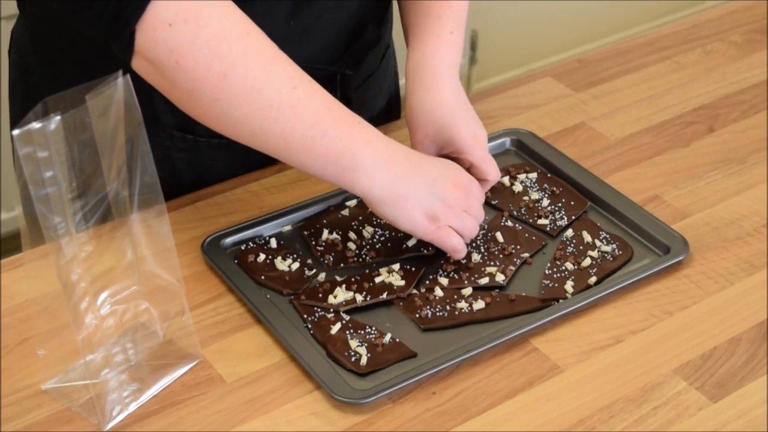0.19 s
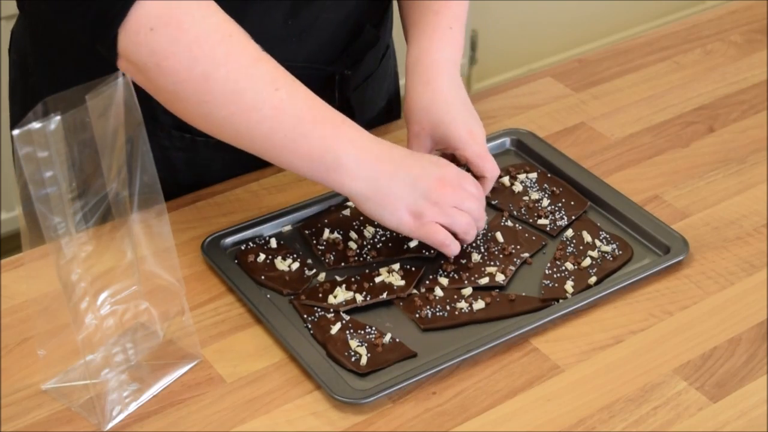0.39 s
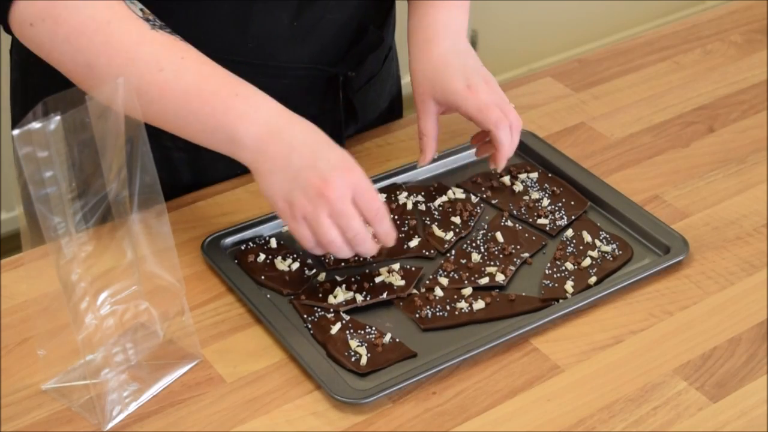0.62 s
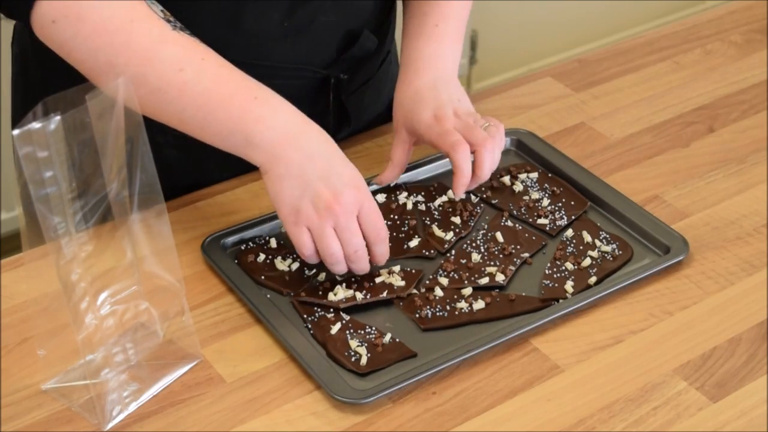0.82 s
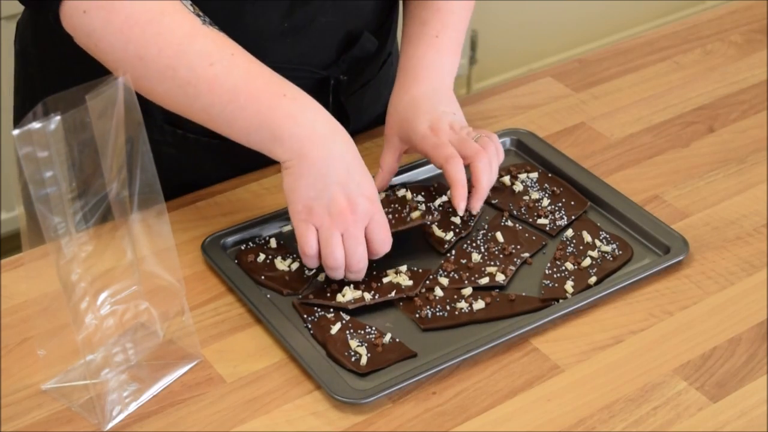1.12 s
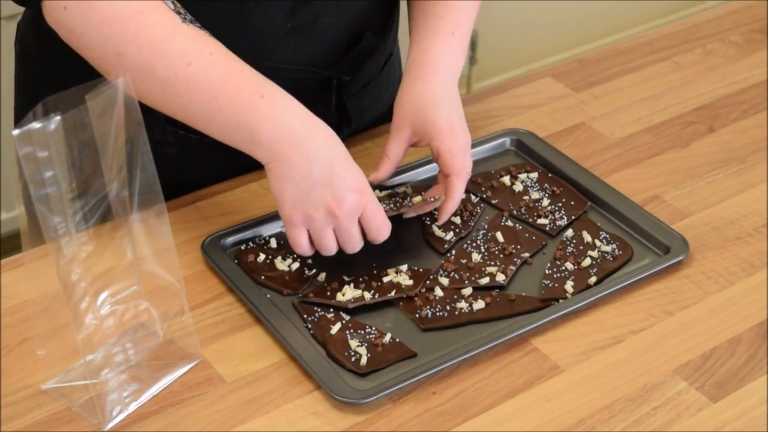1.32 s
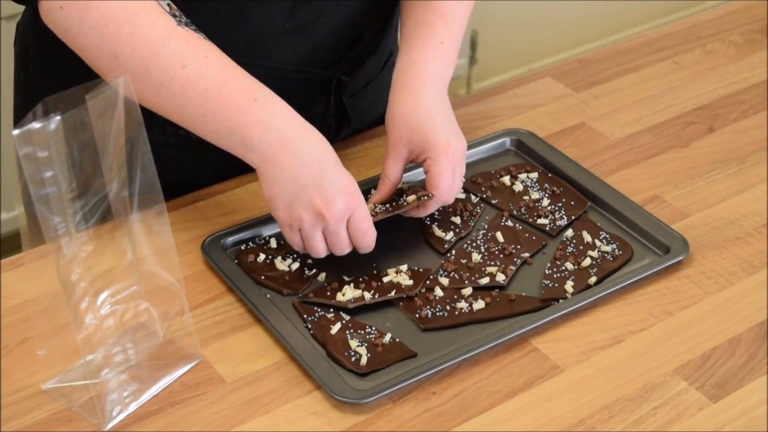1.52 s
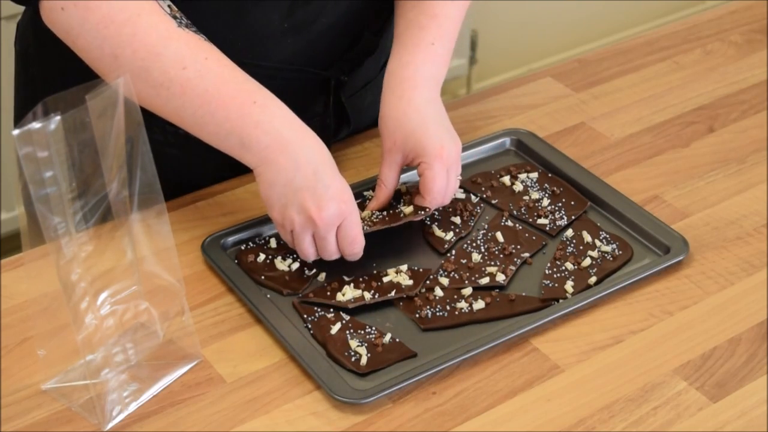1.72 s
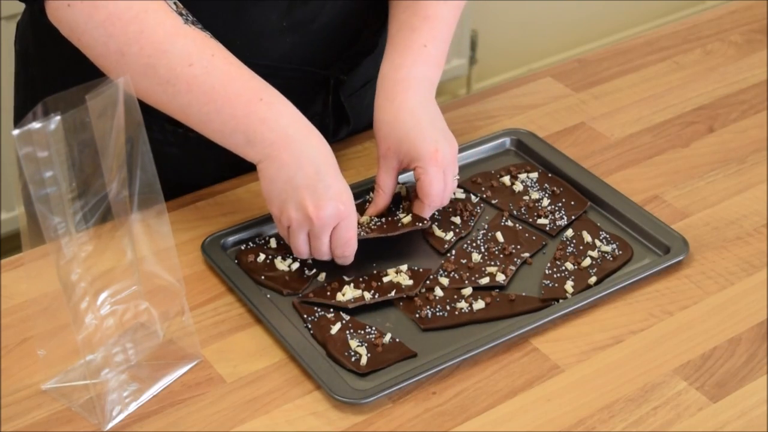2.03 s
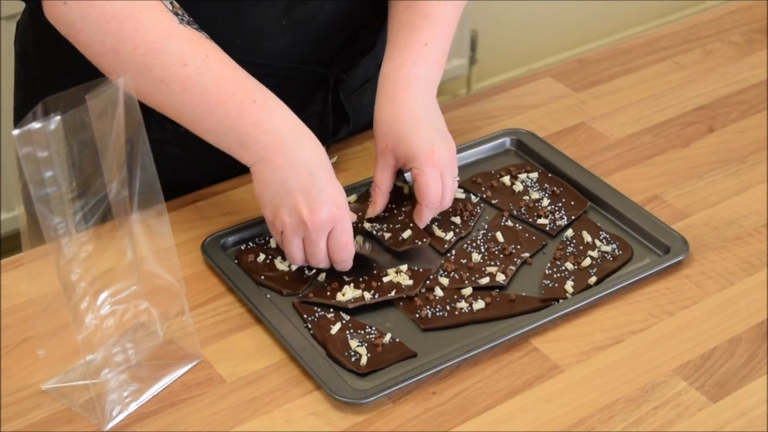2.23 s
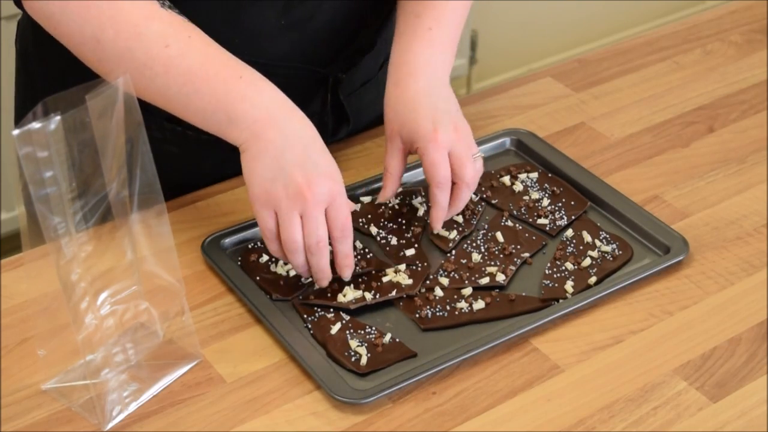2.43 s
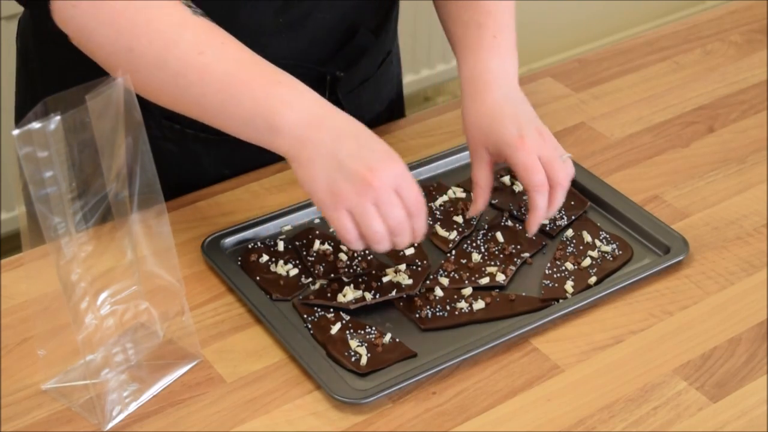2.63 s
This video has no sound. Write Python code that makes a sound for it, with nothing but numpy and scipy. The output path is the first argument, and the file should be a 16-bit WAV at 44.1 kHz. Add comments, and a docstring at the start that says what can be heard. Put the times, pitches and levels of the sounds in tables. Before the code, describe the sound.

Hard chocolate pieces crack sharply and clack against a baking tray in a small indoor kitchen.

```python
"""Hands snap set chocolate on a metal baking tray, close and near the middle, in a small kitchen, 2.75 s.
Hiss and a thin whine run throughout; a faint slide and knock lead to the first hard snap at 0.24 s.
A second snap follows at 0.61 s, then lesser knocks, slides and crunches; single knocks from 1.5 s to 2.1 s.
From 2.27 s pieces slide, crunch and settle, and faint knocks end it. Each contact is a burst of tiny
fractures ringing the piece and the tray's modes; dense reflections answer briefly from the room."""
import sys
import numpy as np
from scipy import signal
from scipy.fft import rfft, irfft
from scipy.io import wavfile

SR = 44100
rng = np.random.default_rng(int(sys.argv[2]) if len(sys.argv) > 2 else 0)


def materialize(psi):
    """Save the field psi as 16-bit PCM at rate SR to the path in sys.argv[1].

    A 1-D psi becomes a single channel; in a 2-D psi each row is a channel.
    """
    bounded = np.clip(np.atleast_2d(psi).T, -1, 1)
    quanta = np.round(bounded * 32767).astype(np.int16)
    wavfile.write(sys.argv[1], SR, quanta)


def attenuation_scalar(level_db):
    """Turn a level in dB into a linear amplitude multiplier (20 dB per decade)."""
    decades = np.asarray(level_db, float) / 20
    return 10 ** decades


N = 121275

# Background of appliances and microphone, spectrum shape: f/Hz, relative density/dB
HISS_SHAPE = [(15, -50), (25, -32), (59, -7), (120, -7), (149, -12), (195, -2.5), (416, -4.5), (531, -5),
              (575, -4.5), (796, -4), (2000, -8.5), (2220, -7.5), (3340, -15), (6740, -21), (16000, -33)]
# Likeness of left and right in the hiss: f/Hz, correlation/1
HISS_LIKENESS = [(60, 0.99), (180, 0.95), (550, 0.79), (1650, 0.39), (4970, 0.073), (15000, 0.19)]
HISS_DB = -55   # rms over both channels
# Partials of the whine: multiple of its pitch/1, rms level before the wobble/dB
WHINE_PARTIALS = [(1, -66.5), (2, -85), (3, -87), (4, -92)]
WHINE_HZ, WHINE_WOBBLE_DB, WHINE_WOBBLE_PER_S = 2255.5, 1.5, 8.0
# Narrow hums: f/Hz, width of each resonance/Hz, rms level/dB
NARROW_HUMS = [(123, 21, -72), (253, 6.7, -73), (543, 9.3, -72), (834, 24, -72), (2925, 210, -69)]
# One faint high hum: f/Hz, width of each resonance/Hz, rms level/dB
HIGH_HUM = (6590, 60, -83)

# Decay of the kitchen by 60 dB: f/Hz, t60/s
ROOM_DECAY = [(250, 1), (1000, 0.4), (3000, 0.28), (8000, 0.33), (14000, 0.23)]
# Likeness of left and right in the reflections: f/Hz, correlation/1
ROOM_SIDES = [(250, 0.99), (1000, 1), (3000, 0.8), (9000, 0.61)]
ROOM_DB, ROOM_DELAY_S = -7.5, 0.0022   # energy of the room's answer; silence before it starts

# Pieces sliding: start t/s, length/s, body level/dB, treble level/dB (both at the middle of the slide)
SLIDE_EVENTS = [(.022, 0.012, -50.5, -50.5), (0.393, 0.11, -54, -65.5), (0.872, 0.086, -54.5, -65.5),
                (0.938, 0.091, -60, -69), (1.027, 0.033, -51, -63), (1.133, 0.023, -61, -71),
                (1.163, 0.053, -52, -62), (2.268, 0.065, -45, -55.5), (2.332, 0.056, -51, -53),
                (2.393, 0.041, -51.5, -60), (2.456, 0.017, -55, -67), (2.53, 0.036, -53, -71)]
FRACTURES_PER_S, FRACTURE_SPREAD_DB = 14000, 2.5
BODY_LOW_HZ, BODY_HIGH_HZ = 610, 3890
TREBLE_LOW_HZ, TREBLE_HIGH_HZ = 4440, 10980

# Tray modes: f/Hz, relative level/dB, t60/s
TRAY_MODES = [(237, -5.5, 0.27), (294, 0, .08), (368, 5, 0.091), (447, -4, .07), (692, 5, 0.13),
              (825, -14.5, 0.22), (1077, -23, 0.3), (1213, -17, 0.41), (1470, 8, 0.14), (1560, -13, 0.36),
              (1900, -4, 0.2), (1955, 12, 0.17), (2186, -36, 0.13), (2430, -2, 0.11), (3070, -44, 0.11),
              (3180, 22, 0.033), (3890, 0, 0.2)]
# A piece lands flat and the low modes boom: t/s, drive level/dB, centre f/Hz
THUD_EVENTS = [(.243, -38, 504), (.250, -38.5, 684), (.252, -38.5, 384), (.612, -37.5, 580),
               (.629, -41, 353), (.860, -54, 700), (.885, -53, 392), (1.006, -53, 750), (1.030, -58, 700),
               (1.119, -56, 700), (1.541, -44.5, 455), (1.548, -46, 307), (2.116, -34, 667),
               (2.120, -36.5, 242), (2.286, -46, 680), (2.288, -43.5, 325), (2.448, -44, 404),
               (2.478, -44, 388), (2.487, -40, 720)]
TRAY_DB, STRIKE_SPREAD_DB = -17.5, 2.0   # tray drive against the piece's ring; chance per mode
TRAY_REACH_OCT, THUD_REACH_OCT = 0.95, 0.46   # distance from the centre where a mode is 6 dB down
THUD_MS, TRAY_TO_ROOM_DB = 1.0, -10

# Sharp cracks and knocks:
# t/s, body level/dB, piece pitch f/Hz, ring level re body/dB, treble level re body/dB
KNOCK_EVENTS = [(0.1308, -58.5, 1270, 2.5, -9), (.2310, -29.5, 1900, -27, -9),
                (0.2404, -22, 1695, -4.5, -6.5), (0.3891, -39, 1720, -7.5, -9),
                (0.4414, -49.5, 1760, 0, -17), (.6037, -32.5, 2800, 6.5, -9),
                (0.6068, -23, 1560, -5.5, -15), (.8590, -38, 805, -8.5, -22), (0.881, -36, 1870, -12, -12),
                (1.0282, -42, 1770, -15, -12), (1.1265, -44, 1180, -3, -18),
                (1.5376, -32.5, 1180, -12, -11), (1.5457, -38, 1253, 8.5, -3.5),
                (1.8140, -41.5, 3350, -9, -9), (2.1098, -29, 1450, -10, -2), (2.382, -48, 3000, -5, -10),
                (2.5070, -51, 1220, -2, -4.5), (2.5195, -38.5, 734, -2.5, -9.5),
                (2.7468, -47.5, 2400, -16, -10)]
# Soft crunches as pieces settle, swelling before they die:
# t/s, body level/dB, piece pitch f/Hz, ring level re body/dB, treble level re body/dB
CRUNCH_EVENTS = [(.014, -53, 1390, -6, -17), (.411, -46, 1800, -4, -9), (.457, -46, 1560, -14, -13),
                 (.613, -35, 1390, -11, -12), (.631, -45, 1010, 6.5, -22), (0.916, -51.5, 1070, 0.5, -8),
                 (1.003, -46.5, 1140, -2, -18), (1.116, -50.5, 790, 3, -20), (1.151, -56, 1010, 5, -8),
                 (1.556, -49.5, 2160, 8, -27), (2.283, -42.5, 740, 1.5, -13), (2.292, -43.5, 940, 2.5, -9),
                 (2.342, -48.5, 3020, -11, -1), (2.421, -45.5, 1550, 1, -16), (2.427, -39, 2240, -14, -20),
                 (2.436, -32, 2000, -3.5, -7.5), (2.441, -34.5, 1180, -3, -2), (2.451, -34, 1790, -3, -9),
                 (2.465, -40.5, 1064, 1.5, -17), (2.476, -43, 1530, 8.5, -11),
                 (2.488, -45.5, 880, 2.5, -12), (2.544, -54.5, 1540, 6.5, -19), (2.562, -50, 844, -6, -5.5)]
KNOCK_MS, CRUNCH_MS, CRUNCH_RISE_MS = 5.5, 5.5, 3.7   # time constants
FIRST_CLICK_DB = 9   # the click that opens a knock
PIECE_Q, BODY_LOW_LAW = 4.5, 20.2   # lower edge of a piece's body: Hz per root of its pitch
SPARKLE_LOW_HZ, SPARKLE_DB = 11250, -1.5   # the topmost edge grows twice as fast as the treble
RING_TO_ROOM_DB = -5   # the piece's ring reaches the walls weaker than its crack

MIC_LOW_HZ, AIR_TOP_HZ = 206, 13700
NEAR_PAN_DB = -0.47   # on the left, and the opposite on the right
SIDE_DB, SIDE_LOW_HZ, SIDE_LAG_MS = -24, 2050, 0.275   # a near surface reflects unevenly to the two sides


def rms_one(x):
    """Scales a signal to rms 1."""
    return x / np.sqrt(np.mean(x ** 2) + 1e-20)


def at_hz(points, hz):
    """Reads a table of (f/Hz, value) along log frequency."""
    table = np.array(points)
    return np.interp(np.log(hz), np.log(table[:, 0]), table[:, 1])


def band(x, low_hz, high_hz):
    """Band-pass with gentle edges."""
    sos = signal.butter(2, [low_hz, min(high_hz, .45 * SR)], "band", fs=SR, output="sos")
    return signal.sosfilt(sos, x)


def resonate(x, hz, width_hz):
    """One resonance, gain 1 on top."""
    r = np.exp(-np.pi * width_hz / SR)
    rise = np.array([1, 0, -1]) * (1 - r * r) / 2
    return signal.lfilter(rise, [1, -2 * r * np.cos(2 * np.pi * hz / SR), r * r], x)


def ring_twice(x, hz, width_hz):
    """Two equal resonances in a row, for a narrower peak."""
    return resonate(resonate(x, hz, width_hz), hz, width_hz)


def drift(rate):
    """Slow chance of spread 1, from noise smoothed twice; rate in Hz."""
    r = np.exp(-2 * np.pi * rate / SR)
    slow = signal.lfilter([1], [1, -2 * r, r * r], rng.standard_normal(N + SR))
    return rms_one(slow[SR:])   # the first second lets the smoothing settle


def spread(pair, alike):
    """Left and right of the given likeness, as middle and side from two unrelated signals."""
    alike = np.clip(alike, 0, 1)
    middle = np.sqrt((1 + alike) / 2) * pair[0]
    side = np.sqrt((1 - alike) / 2) * pair[1]
    return middle + side * np.array([[1], [-1]])


def hiss():
    """Steady background of appliances and microphone: noise shaped per frequency."""
    hz = np.maximum(np.arange(N // 2 + 1) * SR / N, 1)
    pair = rfft(rng.standard_normal((2, N))) * attenuation_scalar(at_hz(HISS_SHAPE, hz))
    return attenuation_scalar(HISS_DB) * rms_one(irfft(spread(pair, at_hz(HISS_LIKENESS, hz)), N))


def whine():
    """A thin tone with overtones wobbles slightly in level; resonances make noise into narrow hums."""
    t = np.arange(N) / SR
    tone = np.zeros(N)
    for multiple, db in WHINE_PARTIALS:
        turns = multiple * WHINE_HZ * t + rng.random()
        tone += attenuation_scalar(db) * np.sqrt(2) * np.sin(2 * np.pi * turns)
    hums = np.zeros(N)
    for hz, width_hz, db in [*NARROW_HUMS, HIGH_HUM]:
        hums += attenuation_scalar(db) * rms_one(ring_twice(rng.standard_normal(N), hz, width_hz))
    return tone * attenuation_scalar(WHINE_WOBBLE_DB * drift(WHINE_WOBBLE_PER_S)) + hums


def kitchen(x):
    """Dense reflections that die away band by band."""
    t, edges = np.arange(SR // 2) / SR, 100 * 2 ** np.arange(0, 7.6, .5)
    white = rng.standard_normal((2, 2, len(t)))
    tail = np.zeros((2, len(t)))
    for k, (low_hz, high_hz) in enumerate(zip(edges, edges[1:])):
        centre_hz = np.sqrt(low_hz * high_hz)
        # neighbouring bands take unrelated noise
        pair = spread(band(white[k % 2], low_hz, high_hz), at_hz(ROOM_SIDES, centre_hz))
        tail += pair * attenuation_scalar(-60 * t / at_hz(ROOM_DECAY, centre_hz))
    tail *= np.clip(t / ROOM_DELAY_S - 1, 0, 1)   # silent for one delay, full after two
    tail /= np.sqrt(np.sum(tail ** 2) / 2)
    return attenuation_scalar(ROOM_DB) * signal.fftconvolve(x[None], tail, axes=1)[:, :N]


def fractures(size):
    """Dense random clicks of uneven size and either sign."""
    chance, strength, sign = rng.random((3, size))
    clicks = chance < FRACTURES_PER_S / SR
    level_db = -FRACTURE_SPREAD_DB * np.log(np.maximum(strength, .03))
    return clicks * attenuation_scalar(level_db) * np.sign(sign - .5)


def slides():
    """Grit under a sliding piece, random clicks in a body and a treble band, swells and fades."""
    t, grit = np.arange(N) / SR, fractures(N)
    body = rms_one(band(grit, BODY_LOW_HZ, BODY_HIGH_HZ))
    treble = rms_one(band(grit, TREBLE_LOW_HZ, TREBLE_HIGH_HZ))
    out = np.zeros(N)
    for start_s, length_s, body_db, treble_db in SLIDE_EVENTS:
        swell = np.abs(np.sin(np.pi * np.clip((t - start_s) / length_s, 0, 1)))
        out += swell * (attenuation_scalar(body_db) * body + attenuation_scalar(treble_db) * treble)
    return out


def tray():
    """Every contact strikes the tray's decaying modes near its pitch; thuds push them softly."""
    hz, mode_db, t60 = np.transpose(TRAY_MODES)
    modes = len(hz)
    drive = np.zeros((modes, N + SR))
    push = np.hanning(int(THUD_MS * SR / 1000) + 3)
    hits = [(s, db + ring_db + TRAY_DB, piece_hz, TRAY_REACH_OCT, np.ones(1))
            for s, db, piece_hz, ring_db, _ in [*KNOCK_EVENTS, *CRUNCH_EVENTS]]
    hits += [(s, db, centre_hz, THUD_REACH_OCT, push / push.sum()) for s, db, centre_hz in THUD_EVENTS]
    for s, db, centre_hz, reach_oct, shape in hits:
        off_centre_db = -6 * (np.log2(hz / centre_hz) / reach_oct) ** 2
        share_db = db + mode_db + off_centre_db + STRIKE_SPREAD_DB * rng.standard_normal(modes)
        share = attenuation_scalar(share_db) * rng.choice([-1, 1], modes)
        i = int(s * SR)
        drive[:, i:i + len(shape)] += share[:, None] * shape
    r, w = attenuation_scalar(-60 / (t60 * SR)), 2 * np.pi * hz / SR   # decay and turn per sample
    out = np.zeros(N)
    for k in range(modes):
        poles = [1, -2 * r[k] * np.cos(w[k]), r[k] ** 2]
        out += signal.lfilter([0, np.sin(w[k])], poles, drive[k, :N] + 1e-18)
    return out


def voice(burst, piece_hz):
    """A burst heard as the piece's broad body, its ring, its treble and its topmost edge."""
    low_hz = BODY_LOW_LAW * np.sqrt(piece_hz)
    body = band(band(burst, low_hz, BODY_HIGH_HZ), low_hz / 2, BODY_HIGH_HZ * 1.254)
    ring = ring_twice(burst, piece_hz, piece_hz / PIECE_Q)
    treble = band(burst, TREBLE_LOW_HZ, TREBLE_HIGH_HZ)
    treble = band(treble, TREBLE_LOW_HZ / 2, TREBLE_HIGH_HZ * 1.39)
    return body, ring, treble, band(burst, SPARKLE_LOW_HZ, 12200)


def chocolate():
    """Fracture bursts sound through the piece; the walls (row 2) get one filtered click in their place."""
    size = 4096
    ms, out = np.arange(size) * 1000 / SR, np.zeros((2, N + size))
    to_room_db = np.array([[0], [RING_TO_ROOM_DB]])
    kinds = ((KNOCK_EVENTS, 0, KNOCK_MS), (CRUNCH_EVENTS, CRUNCH_RISE_MS, CRUNCH_MS))
    for events, rise_ms, length_ms in kinds:
        for s, db, piece_hz, ring_db, treble_db in events:
            burst = fractures(size)
            if rise_ms:
                burst *= 1 - np.exp(-ms / rise_ms)
            else:
                burst[0] = attenuation_scalar(FIRST_CLICK_DB)
            pair = np.array([burst * np.exp(-ms / length_ms), ms == 0]) + 1e-18
            levels_db = (db, db + ring_db + to_room_db, db + treble_db, db + 2 * treble_db + SPARKLE_DB)
            i = min(int(s * SR), N)
            for part, part_db in zip(voice(pair, piece_hz), levels_db):
                # a level is the rms of the part's energy over one time constant
                energy = np.sum(part ** 2, axis=1, keepdims=True)
                out[:, i:i + size] += attenuation_scalar(part_db) * part / np.sqrt(energy / (SR / 1000 * length_ms))
    return out[:, :N]


def scene():
    """Chocolate and tray close to the microphone near the middle, their room, the background."""
    # row 1 goes straight to the microphone, row 2 to the walls
    sources = chocolate() + slides() + tray() * attenuation_scalar([[0], [TRAY_TO_ROOM_DB]])
    near, walls = band(band(sources, MIC_LOW_HZ, AIR_TOP_HZ), MIC_LOW_HZ, 23000)
    t = np.arange(N)
    late = np.interp(t - SIDE_LAG_MS * SR / 1000, t, band(near, SIDE_LOW_HZ, 13000))
    side = attenuation_scalar(SIDE_DB) * late * [[1], [-1]]
    direct = near * attenuation_scalar([[NEAR_PAN_DB], [-NEAR_PAN_DB]])
    return direct + side + kitchen(walls) + hiss() + whine()


def roll_off(x):
    """The treble ends steeply here."""
    return signal.sosfilt(signal.butter(12, 16520, fs=SR, output="sos"), x)


def record(dry):
    """A small stereo recorder takes down the finished mix."""
    return roll_off(dry)


dry = scene()
out = record(dry)
materialize(out)
```